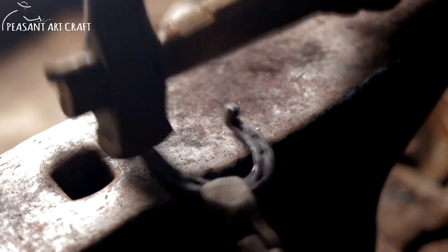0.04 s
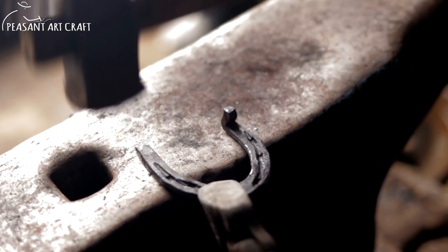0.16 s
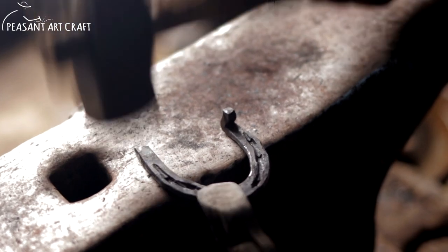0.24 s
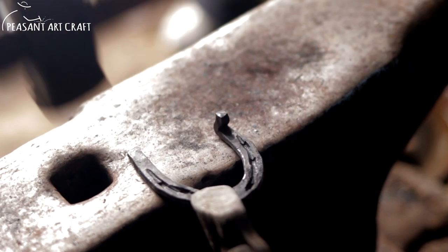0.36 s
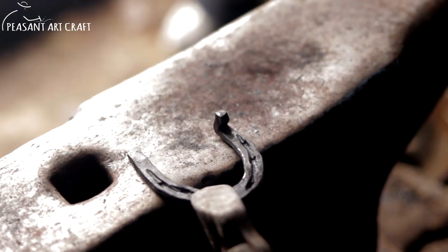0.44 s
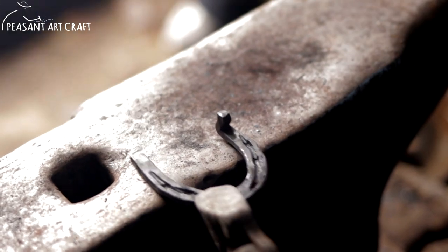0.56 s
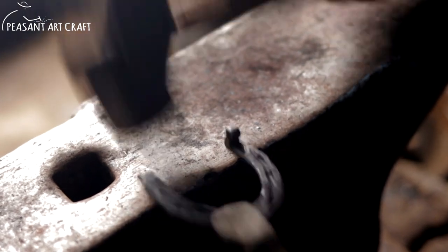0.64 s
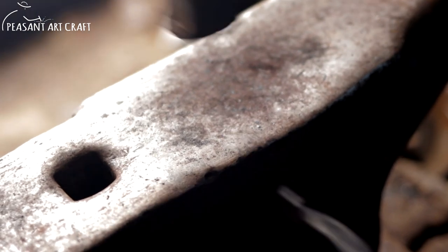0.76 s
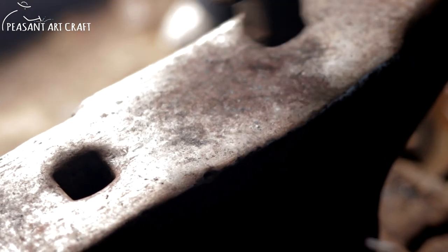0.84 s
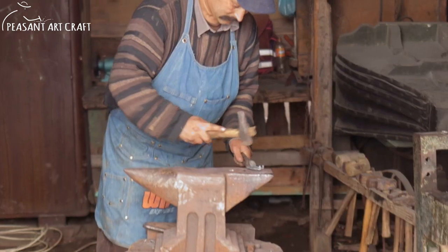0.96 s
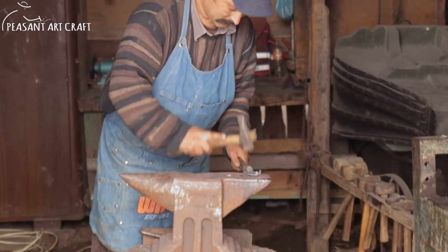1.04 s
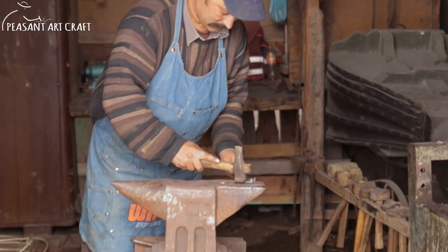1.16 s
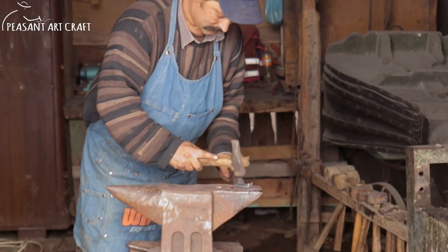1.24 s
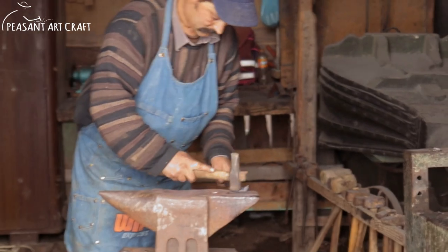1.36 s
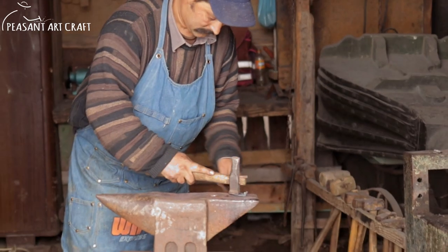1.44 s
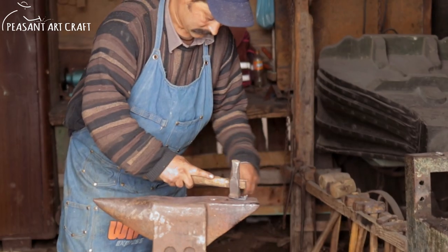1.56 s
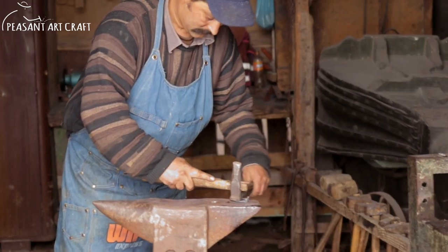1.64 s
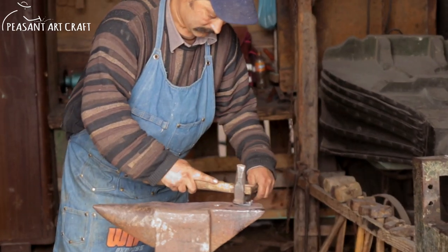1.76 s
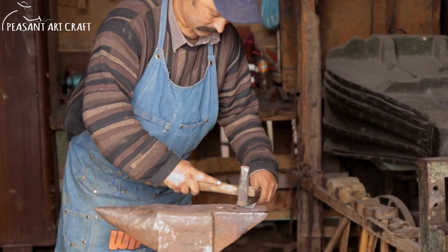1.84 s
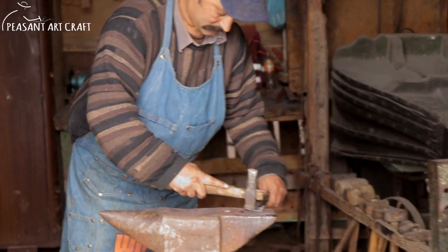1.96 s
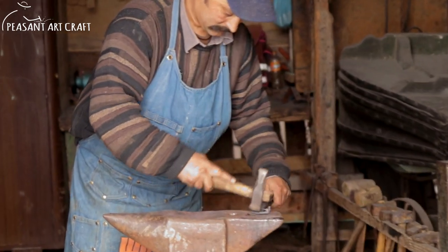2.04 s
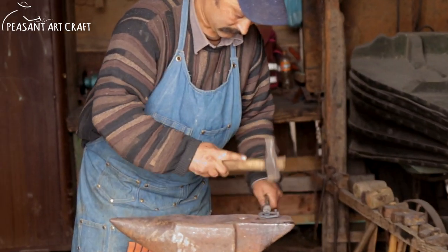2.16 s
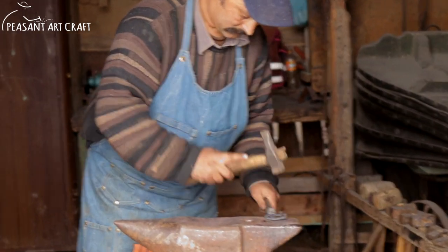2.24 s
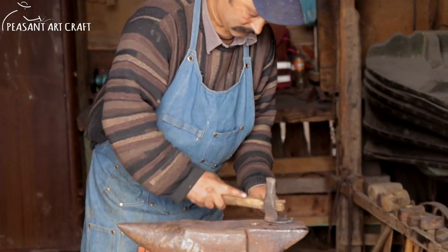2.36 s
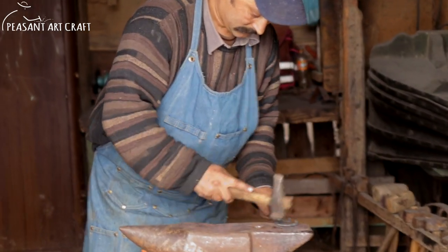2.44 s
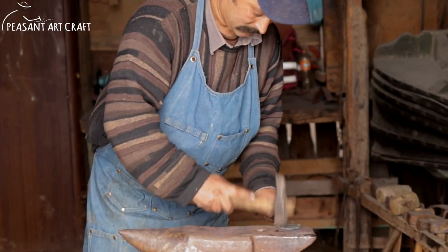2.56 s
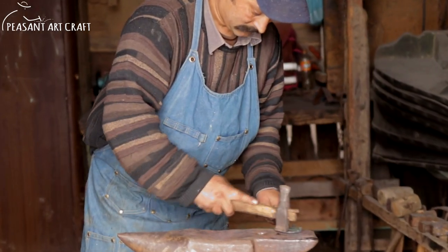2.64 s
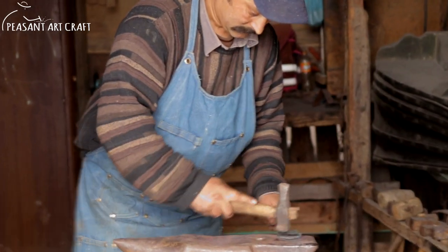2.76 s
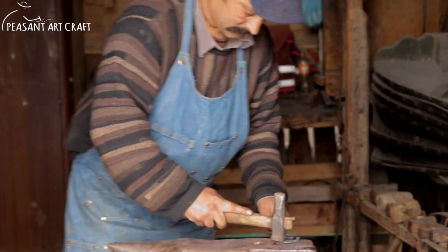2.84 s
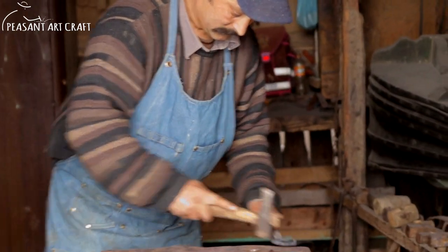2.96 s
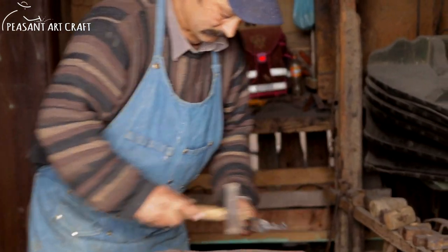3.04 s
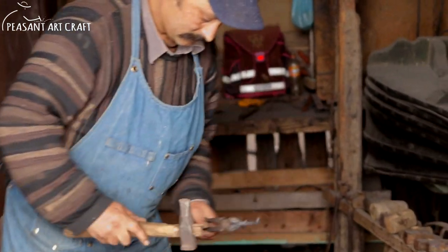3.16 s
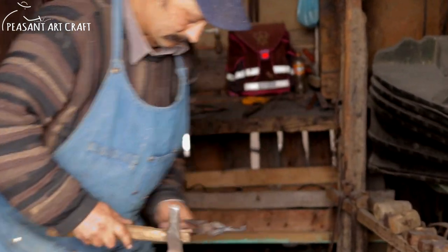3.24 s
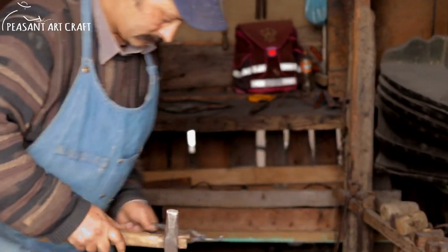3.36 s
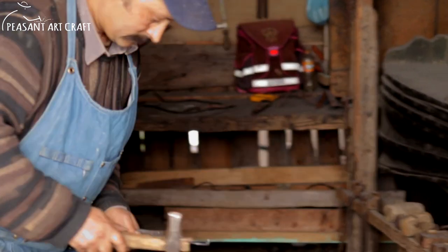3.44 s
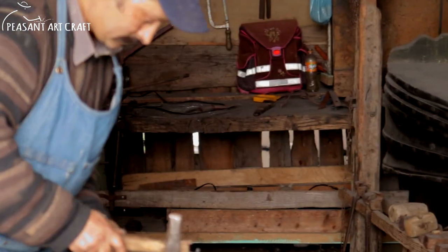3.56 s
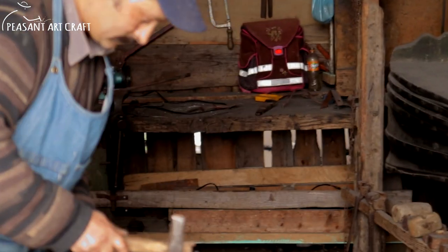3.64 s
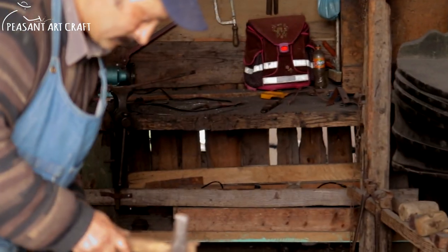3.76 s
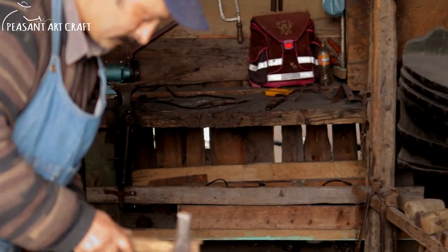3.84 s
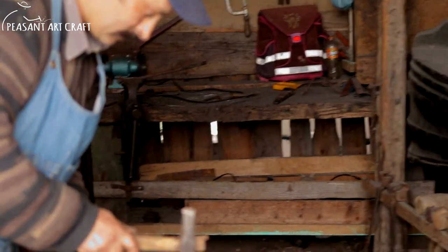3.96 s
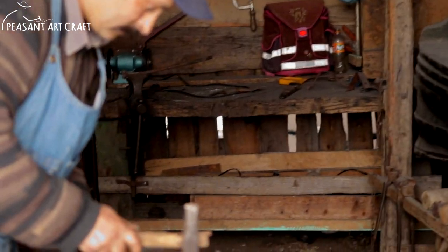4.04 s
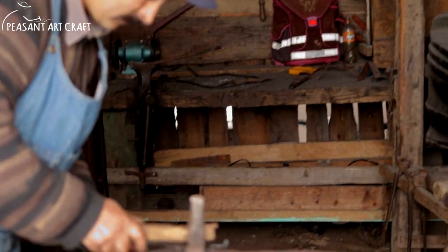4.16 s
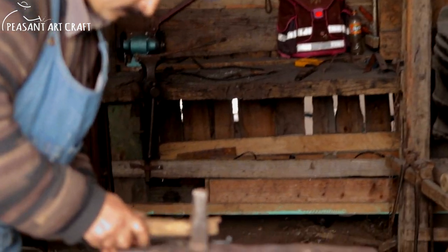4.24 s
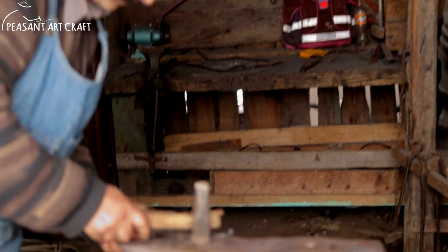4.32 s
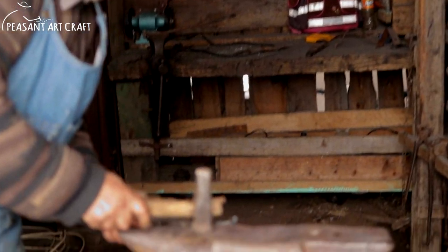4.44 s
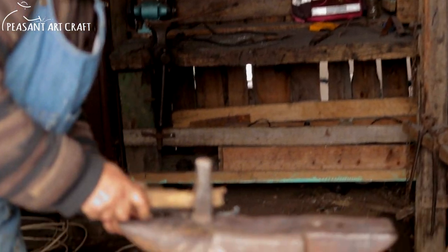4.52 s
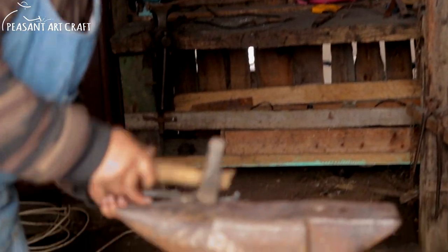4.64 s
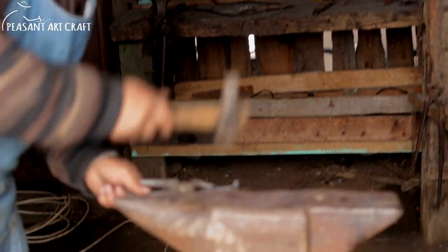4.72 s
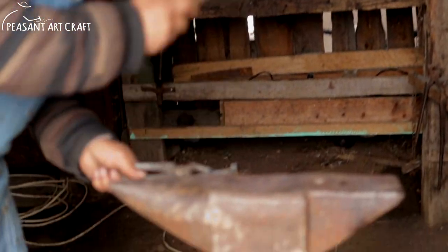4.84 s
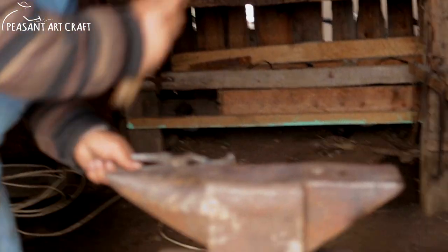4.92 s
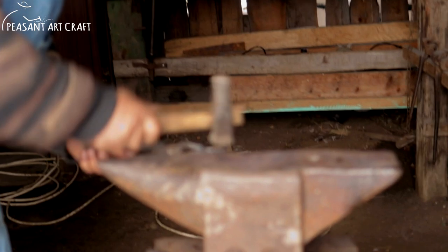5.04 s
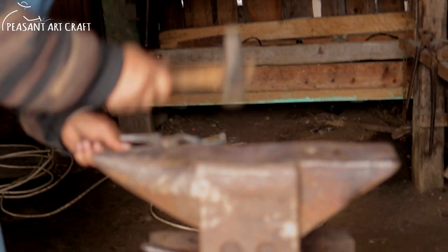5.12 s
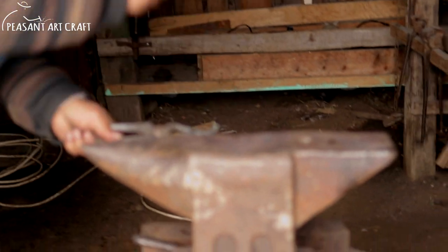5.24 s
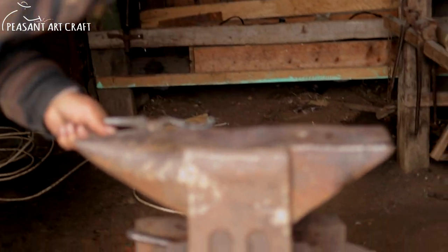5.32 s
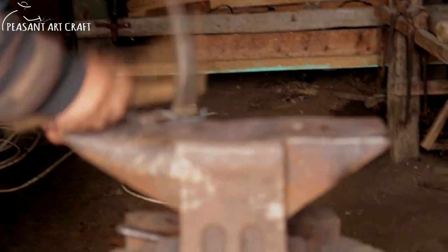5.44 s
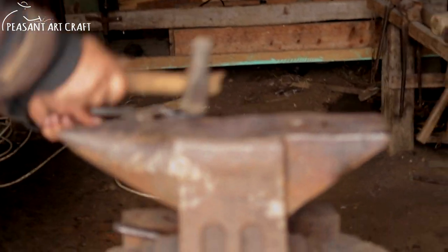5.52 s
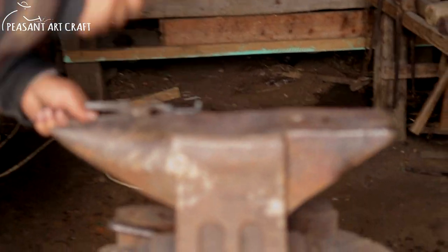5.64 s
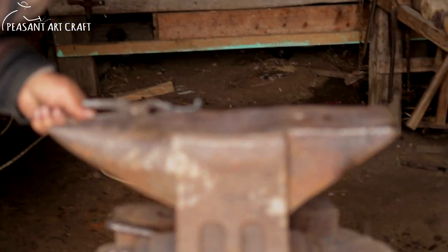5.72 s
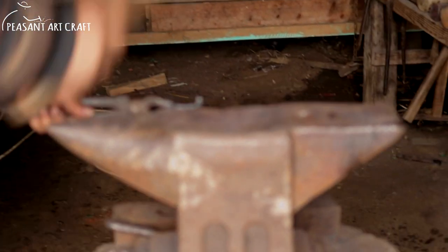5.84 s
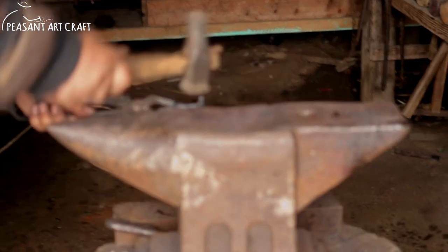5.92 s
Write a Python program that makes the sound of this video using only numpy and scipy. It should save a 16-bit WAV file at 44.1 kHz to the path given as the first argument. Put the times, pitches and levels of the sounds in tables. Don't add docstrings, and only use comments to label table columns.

```python
import sys
import numpy as np
from scipy import signal
from scipy.io import wavfile

SR = 44100
rng = np.random.default_rng(int(sys.argv[2]) if len(sys.argv) > 2 else 0)


def store_wav(level_fs):
    pcm = np.round(np.clip(np.atleast_2d(level_fs), -1, 1) * 32767)
    wavfile.write(sys.argv[1], SR, pcm.T.astype(np.int16))


def voltage_ratio(level):
    return 10 ** (np.asarray(level, float) / 20)


N = 263718
SOUND_S = .7
BAND_EDGES_HZ = 40 * 2 ** np.arange(0, 9, .5)


def rms_one(x):
    return x / np.sqrt(np.mean(x ** 2) + 1e-20)


def at_hz(points, hz):
    points = np.array(points)
    return [np.interp(np.log(hz), np.log(points[:, 0]), column) for column in points.T[1:]]


def band(x, low_hz, high_hz):
    sos = signal.butter(2, [low_hz, min(high_hz, .45 * SR)], "band", fs=SR, output="sos")
    return signal.sosfilt(sos, x)


def resonance(x, hz, width_hz):
    r = np.exp(-np.pi * width_hz / SR)
    poles = [2, -4 * r * np.cos(2 * np.pi * hz / SR), 2 * r * r]
    return signal.lfilter([1 - r * r, 0, r * r - 1], poles, x)


def pair(length, alike):
    mid, side = rng.standard_normal((2, length))
    alike = np.clip(alike, 0, 1)
    return np.sqrt((1 + alike) / 2) * mid + np.sqrt((1 - alike) / 2) * side * [[1], [-1]]


def add(out, s, sound):
    at = round(s * SR)
    sound = sound[..., max(-at, 0):N - at]
    at = max(at, 0)
    out[..., at:at + sound.shape[-1]] += sound


def dying(t60_s, length_s=SOUND_S):
    return voltage_ratio(-60 * np.arange(int(length_s * SR)) / SR / t60_s)


def struck(hz, t60_s):
    fall = dying(t60_s)
    return fall * np.sin(2 * np.pi * hz * np.arange(len(fall)) / SR)


def struck_grit():
    return rng.standard_normal(int(SOUND_S * SR))


# frequency in Hz, t60 in s, level in dB, left-right likeness 0-1.
WORKSHOP = [(100, 0.04, -12, 0.6), (280, 0.31, 9.5, .85), (600, 0.23, 4.5, 0.9), (2000, 0.24, -3, .95),
            (4780, 0.22, 4.5, .1), (9150, .21, 4.5, 0.3), (13800, 0.06, -8.5, .05)]


def workshop(x):
    echo, echo_s = 0, .6
    for low, high in zip(BAND_EDGES_HZ, BAND_EDGES_HZ[1:]):
        t60_s, level_db, alike = at_hz(WORKSHOP, np.sqrt(low * high))
        noise = band(pair(int(echo_s * SR), alike), low, high)
        echo = echo + voltage_ratio(level_db) * noise * dying(t60_s, echo_s)
    echo = echo * (1 - dying(0.025, echo_s)) / np.sqrt(SR * 0.035)
    return signal.fftconvolve(x * np.ones((2, 1)), echo, axes=1)[:, :N]


# frequency in Hz, level in dB.
AIR = [(18, -41), (30, 0), (164, -17), (293, -1), (433, -13.5), (642, -6.5), (1930, -16.5), (9030, -24.5),
       (12400, -35), (15600, -58)]
AIR_DB = -60
HUM_HZ, HUM_WIDTH_HZ, HUM_DB = 296, 30, -69.5


def air():
    white = pair(N, .8), pair(N, 0.4)
    still = 0
    for k, (low, high) in enumerate(zip(BAND_EDGES_HZ, BAND_EDGES_HZ[1:])):
        level_db = at_hz(AIR, np.sqrt(low * high))[0]
        still = still + voltage_ratio(level_db) * band(white[k % 2], low, high)
    hum = resonance(resonance(white[0], HUM_HZ, HUM_WIDTH_HZ), HUM_HZ, HUM_WIDTH_HZ)
    return voltage_ratio(AIR_DB) * rms_one(still) + voltage_ratio(HUM_DB) * rms_one(hum)


# loudest moment in s, length in s, level in dB,
# brightness in dB (under 0 rubs, over 0 rustles).
STROKES = [(0.519, 0.081, -67.5, -8), (1.048, 0.17, -49.5, -0.5), (1.111, .06, -46.5, -1.5),
           (1.479, 0.29, -58, 15), (1.57, 0.22, -48, -0.5), (1.778, 0.058, -54, 19),
           (1.877, 0.15, -43.5, -5.5), (1.948, 0.24, -54, 16.5), (2.19, 0.21, -55, -0.5),
           (2.572, 0.15, -46, 0), (2.959, 0.041, -55, -0.5), (3.091, 0.42, -53.5, 4.5),
           (3.528, .12, -37, -0.5), (3.662, 0.24, -49, -2.5), (3.842, 0.11, -49.5, -0.5),
           (3.908, 0.12, -35, 3.5), (4.101, 0.23, -48.5, 3), (4.208, 0.17, -47.5, 8), (4.34, 0.05, -69, 6),
           (4.692, .15, -46.5, 2), (4.75, .12, -51.5, 1.5), (2.86, 0.071, -41.5, 8),
           (1.421, .14, -42, 10.5), (3.75, 0.11, -54.5, -2.5), (5.739, 0.11, -50, -0.5),
           (4.798, 0.066, -50, 7), (5.37, 0.19, -60.5, -2.5), (5.45, 0.11, -56, 3.5),
           (5.841, 0.22, -60.5, -3.5)]
RISE_SHARE, STROKE_SWING_DB = 0.34, 20
FIDGET_DB = -73


def between_blows(layer_db, likes_bright):
    t = np.arange(0, N + 64, 64) / SR
    s, length_s, db, bright_db = np.transpose(STROKES)[:, :, None]
    away = np.where(t < s, (s - t) / RISE_SHARE, (t - s) / (1 - RISE_SHARE)) / length_s
    strokes = voltage_ratio(db + likes_bright * bright_db - STROKE_SWING_DB * away)
    gain = voltage_ratio(FIDGET_DB) + strokes.sum(axis=0)
    return voltage_ratio(layer_db) * np.interp(np.arange(N) / SR, t, gain)


# resonance in Hz, width in Hz, level in dB.
SCRAPE = [(803, 33, 1), (1370, 87, -4), (1940, 34, -17.5), (3250, 630, -14)]
RUB_DB, RUSTLE_DB = -5, -17


def handling():
    grains_per_s = 1800
    sizes = voltage_ratio(3.5 * np.minimum(rng.exponential(1, N), 5)) * (rng.random(N) < grains_per_s / SR)
    grains = rms_one(sizes * rng.choice([-1, 1], N)) + .7 * pair(N, .5)
    scrape = 0.43 * band(grains, 900, 3000)
    for hz, width_hz, db in SCRAPE:
        scrape = scrape + voltage_ratio(db) * resonance(grains, hz, width_hz)
    white = pair(N, 0.71)
    bench = resonance(white, 280, 50)
    rub = band(band(white, 200, 780), 130, 2300) + 2.3 * bench
    rustle = band(grains, 2300, 7000) + .25 * band(grains, 7000, 13000)
    out = between_blows(RUB_DB, -2.2) * rms_one(rub)
    out = out + between_blows(0, 0) * rms_one(scrape)
    return out + between_blows(RUSTLE_DB, 0.94) * rms_one(rustle)


# start in s, peak level in dB, pitch in Hz.
TICKS = [(0.507, -41, 2230), (1.102, -25.5, 600), (1.77, -31.5, 1370), (1.855, -18, 920), (2.088, -35, 742),
         (2.258, -40, 1740), (2.305, -45.5, 2970), (2.962, -37, 1085), (3.068, -42, 1250),
         (3.088, -41.5, 1600), (3.12, -39.5, 3386), (3.612, -43, 654), (3.657, -45.5, 600),
         (3.835, -43, 1500), (4.103, -46, 1490), (4.215, -32, 1370), (4.341, -42, 3250),
         (4.46, -46.5, 1570), (4.581, -36, 1383), (4.679, -29.5, 1470), (4.792, -34.5, 1760),
         (4.917, -54.5, 1100), (4.956, -57.5, 604), (5.365, -35, 1310), (5.405, -41.5, 1370),
         (5.83, -44, 9000)]


def ticks():
    out = np.zeros(N)
    for s, peak_db, hz in TICKS:
        grit = struck_grit() * dying(.014)
        tick = 2.8 * band(grit, hz * .8, hz * 1.25) + .6 * band(grit, hz * .5, hz * 2.2)
        add(out, s, voltage_ratio(peak_db) * tick)
    return out


def contact(clank_hz, clank_db, thud_db, crack_db, grit, rattle, crack_top_hz):
    iron = struck(clank_hz, 0.022) + 0.17 * struck(clank_hz * 1.1, 0.06) + 0.33 * struck(clank_hz * 1.87, .02)
    chatter = band(grit * dying(0.025), 780, 3500)
    clank = voltage_ratio(clank_db + 11) * iron + voltage_ratio(clank_db + 14.0) * chatter
    stump = .6 * struck(250, .05) + .6 * struck(320, .05) + .5 * struck(175, .1)
    stump += .5 * struck(570, .08) + .5 * struck(930, .06)
    thud = voltage_ratio(thud_db + 2.5) * (stump + 7 * band(grit * dying(0.044), 150, 880))
    scale = rattle * band(grit[::-1] * dying(.19), 2500, 17000)
    crack = voltage_ratio(crack_db + 14.0) * (band(grit * dying(.014), 290, crack_top_hz) + scale)
    return clank * (1 - dying(0.0028)) + thud + crack


# frequency in Hz, t60 in s, left over right in dB.
ANVIL_HZ = [2541, 2553, 3291, 3310, 3763, 3942, 4516, 5367, 5651, 6460, 6648, 6700]
ANVIL_T60_S = [.22, .22, .23, .22, .22, .19, .27, .3, .3, .24, .2, .23]
ANVIL_PAN_DB = [0, -1, -0.5, 0.5, 0, 8, -4, -2, -1.2, 1.2, 1, 2.9]
# Hz, s, dB.
FACE_HZ = [7707, 8055, 8283, 9426, 9781, 11560, 12880, 13430, 14135, 14980]
FACE_T60_S = [.29, .22, .36, .26, .15, .2, .16, .18, .42, .24]
FACE_PAN_DB = [-1, -2.5, -7, 1, -2.1, -3.5, 0, -2, -1, -1]
# Hz, s, dB.
HAMMER_HZ = [3130, 3560, 4300, 6080, 9270, 10470]
HAMMER_T60_S = [.05, .06, .05, .05, .09, .045]
HAMMER_PAN_DB = [-1, 1.1, -.5, .6, 1.2, -.4]
# one striking spot, one column a mode in dB against the blow.
ANVIL_WAKES_DB = [(-21.5, -14, -47, -30, -24.5, -18, -40, -24, -25, -29.5, -28, -26),
                  (-12, -11, -26.5, -24, -34, -18, -33.5, -18.5, -23.5, -13, -16.5, -13),
                  (-16.5, -12.5, -34.5, -21.5, -16, -21.5, -19.5, -27.5, -29, -19.5, -16.5, -21.5),
                  (-22, -29.5, -21.5, -29, -35, -30.5, -41, -22.5, -29, -29.5, -26.5, -28),
                  (-13.5, -22, -27.5, -23.5, -38.5, -30, -33.5, -21, -22, -32.5, -25, -41),
                  (-31, -34.5, -41.5, -42.5, -24, -23.5, -39.5, -41, -42.5, -50.5, -25, -30.5),
                  (-29, -17, -16.5, -14.5, -19, -32.5, -41.5, -38.5, -32, -23, -26.5, -27.5),
                  (-8, -13, -7, -15, -8, -13.5, -38, -32.5, -14.5, -11.5, -17, -11.5)]
FACE_WAKES_DB = [(-29.5, -47.5, -59, -34, -41.5, -28.5, -45, -57.5, -56.5, -45.5),
                 (-6.5, -17, -29, -20.5, -21.5, -26, -19.5, -41, -47, -39.5),
                 (-15, -36.5, -39, -32, -47.5, -39.5, -37.5, -38, -54, -49.5),
                 (-27, -30.5, -34.5, -32, -42.5, -35, -33, -47, -34, -36),
                 (-34.5, -57, -48, -31.5, -46.5, -39, -30, -41.5, -46, -51),
                 (-20, -44.5, -55, -25, -41, -36.5, -43.5, -43, -61.5, -54.5),
                 (-19.5, -52.5, -50, -38.5, -52.5, -55, -66, -66, -57, -44.5),
                 (-17.5, -28.5, -24, -24.5, -37.5, -33.5, -37.5, -44, -51.5, -28)]
HAMMER_WAKES_DB = [(-10.5, -20, -36, -19, -25, -24), (-29, -21, -32.5, -26, -15, -30),
                   (-14, -19, -25, -6.5, -11, -32.5), (-21.5, -24, -26, -17.5, -14.5, -30.5),
                   (-26.5, -26.5, -17, -29, -25.5, -45), (-27, -8.5, -24.5, -21, -11, -20.5),
                   (-28, -9, -16, -13.5, -16, -37), (-13.5, -23, -26, -25.5, -20.5, -33)]
EDGE_HZ = [10050, 10890, 11800, 12090, 12620, 13170, 13670, 14630, 15650]
EDGE_T60_S, EDGE_DB = .11, -39
# mode index, then t60 in s.
HORN_MODES = [4, 8]
HORN_T60_S = [.33, .56]
HORN_FIRST_SPOT = 7
TOP_LIFT_DB, TOP_FROM_HZ = 4, 11000


def anvil_ring(spot, freedom, blow_count):
    edge = np.ones(len(EDGE_HZ))
    hz = np.concatenate([ANVIL_HZ, FACE_HZ, HAMMER_HZ, EDGE_HZ])
    t60_s = np.concatenate([ANVIL_T60_S, FACE_T60_S, HAMMER_T60_S, EDGE_T60_S * edge])
    pan_db = np.concatenate([ANVIL_PAN_DB, FACE_PAN_DB, HAMMER_PAN_DB, 0 * edge])
    chance = rng.standard_normal((blow_count, 3, len(hz)))
    edge_db = EDGE_DB + 4 * chance[0, 0, -len(edge):]
    wakes_db = np.concatenate([ANVIL_WAKES_DB[spot], FACE_WAKES_DB[spot], HAMMER_WAKES_DB[spot], edge_db])
    if spot >= HORN_FIRST_SPOT:
        t60_s[HORN_MODES] = HORN_T60_S
    t = np.arange(int(SOUND_S * SR)) / SR
    modes = np.exp(np.outer(2j * np.pi * hz - np.log(1000) / (t60_s * freedom), t))
    signs = np.sign(chance[:, 1])
    signs[:, 1] = -signs[:, 0]
    heights = voltage_ratio(wakes_db + TOP_LIFT_DB * (hz > TOP_FROM_HZ) + chance[:, 0]) * signs
    left = heights * voltage_ratio(pan_db / 2)
    right = heights * voltage_ratio(-pan_db / 2) * np.exp(1j * np.tanh(chance[:, 2]) * hz / 4000)
    return np.stack([(left @ modes).imag, (right @ modes).imag], axis=1)


# freedom to ring as share of t60, clank in Hz, knock sent to the workshop in dB,
# rattle after the crack as share, top of the crack in Hz.
SPOTS = [(.9, 1467, -6.5, 0.017, 9000), (1, 1300, -9.5, 0.023, 18000), (1.01, 1560, -5.5, 0.021, 8100),
         (0.95, 1640, 4, 0.18, 9500), (1.05, 1640, 3.5, 0.1, 14000), (2, 1800, 1, 0.049, 23000),
         (1.01, 1420, 3.5, .025, 8900), (1.09, 1375, -1.5, 0.033, 20000)]
# start in s, blow in dB, then clank, thud and crack in dB against the blow.
BLOWS = [
    [(0.0463, 4.5, -8, -22.5, -18.5), (0.2688, 5.5, -8, -22.5, -17.5)],
    [(0.6629, 10, -10, -29.5, -6.5)],
    [(0.8106, 6.5, -8, -24.5, -15.5), (0.8799, 4, -12.5, -27, -15), (0.9393, -0.5, -11, -25.5, -11.5)],
    [(1.1453, -12.5, -22, -24, -15), (1.3748, -16.5, -20.5, -20, -11.5), (2.833, -14.5, -9.5, -17.5, -13.5)],
    [(2.368, -12.5, -4, -18, -13), (2.612, 3.5, -18, -33.5, -27.5)],
    [(3.1567, 2, -21, -42, -15)],
    [(3.257, -1, -19, -39, -19.5), (3.3363, -3, -20.5, -48, -21)],
    [(5.0315, 7.5, -2.5, -20, -20), (5.4784, 3.5, -0.5, -20, -7.5), (5.901, 10.5, -7, -22, -17)],
]
# start in s, blow in dB.
EARLIER_BLOW = (-0.2, -1)
# start in s, blow in dB.
CHATTER = [(3.4002, -8), (3.4496, -10.5), (3.486, -19), (3.5111, -21), (3.529, -33.5)]
# clank, thud, crack in dB against the blow.
CHATTER_PARTS_DB = (-16.5, -30.5, -25)
FACE_SPOT, DROP_SPOT = 1, 6
RING_ECHO = .18


def hammering():
    direct, sent = np.zeros((2, N)), np.zeros(N)
    earlier_s, earlier_db = EARLIER_BLOW
    add(direct, earlier_s, voltage_ratio(earlier_db) * anvil_ring(FACE_SPOT, SPOTS[FACE_SPOT][0], 1)[0])
    for spot, blows in enumerate(BLOWS):
        if spot == DROP_SPOT:
            blows = list(blows) + [(*bounce, *CHATTER_PARTS_DB) for bounce in CHATTER]
        freedom, clank_hz, echo_db, rattle, crack_top_hz = SPOTS[spot]
        rings = anvil_ring(spot, freedom, len(blows))
        for ringing, (s, blow_db, *parts_db) in zip(rings, blows):
            knock = contact(clank_hz, *parts_db, struck_grit(), rattle, crack_top_hz)
            add(direct, s, voltage_ratio(blow_db) * (ringing + knock))
            add(sent, s, voltage_ratio(blow_db) * (voltage_ratio(echo_db) * knock + RING_ECHO * ringing[0]))
    return direct, sent


RING_DROP_S, RING_DROP_DB = .9552, -15.5


def scene():
    direct, sent = hammering()
    t = np.arange(N) / SR
    next_blow_s = BLOWS[3][0][0]
    ring_gain = voltage_ratio(RING_DROP_DB * np.clip((t - RING_DROP_S) / .001, 0, 1) * (t < next_blow_s - .002))
    touches = ticks()
    steel = (direct + workshop(sent)) * ring_gain + touches + workshop(touches)
    steel = signal.sosfilt(signal.butter(3, 120, "high", fs=SR, output="sos"), steel)
    return steel + handling() + air()


def top_cut(x):
    return signal.sosfilt(signal.butter(12, 15800, fs=SR, output="sos"), x)


def record(dry):
    clipped = np.clip(dry, -.99, .99)
    return top_cut(clipped)


dry = scene()
out = record(dry)
store_wav(out)
```